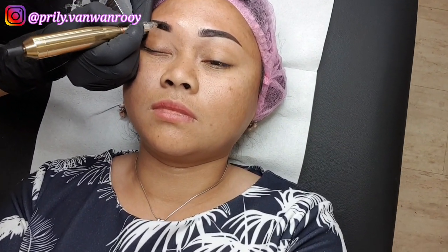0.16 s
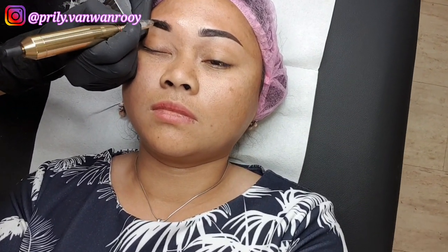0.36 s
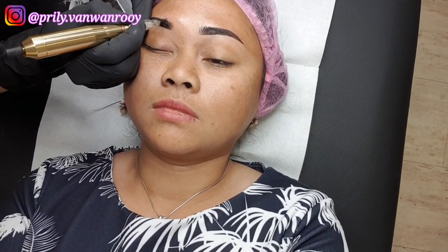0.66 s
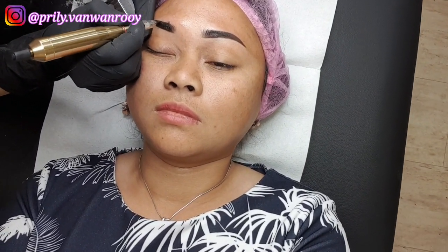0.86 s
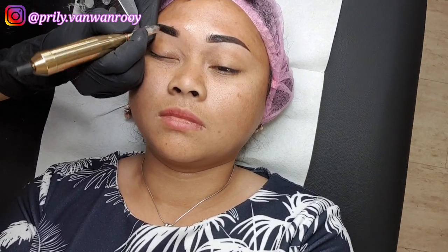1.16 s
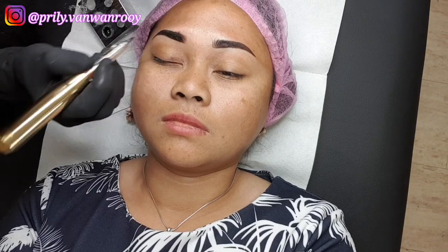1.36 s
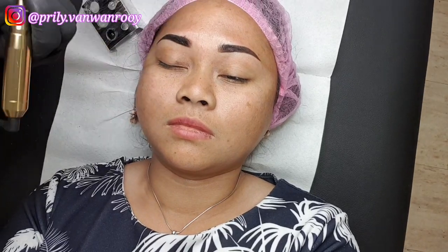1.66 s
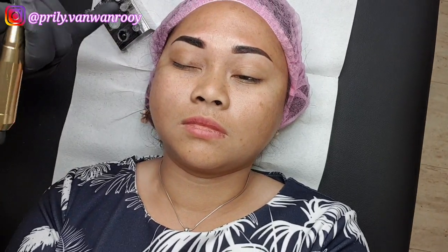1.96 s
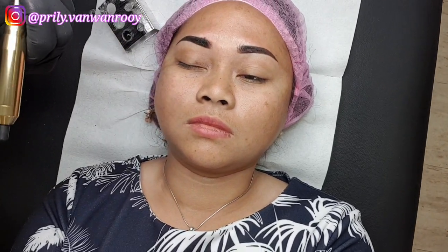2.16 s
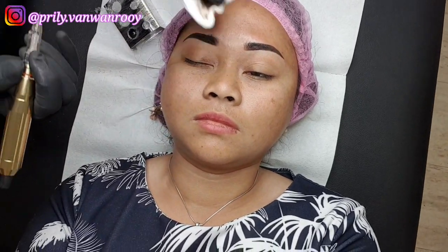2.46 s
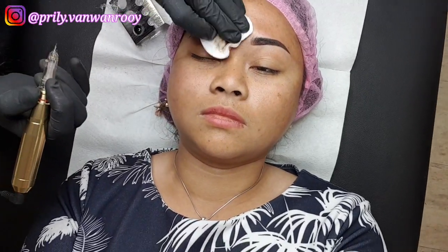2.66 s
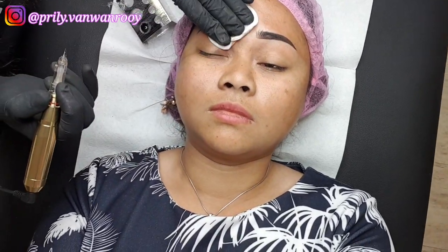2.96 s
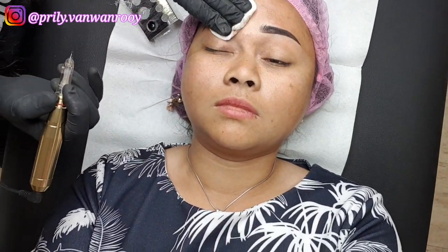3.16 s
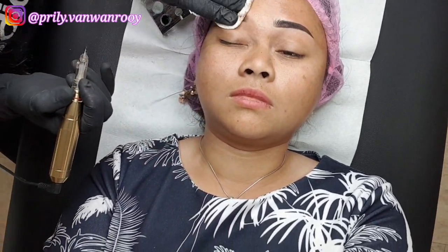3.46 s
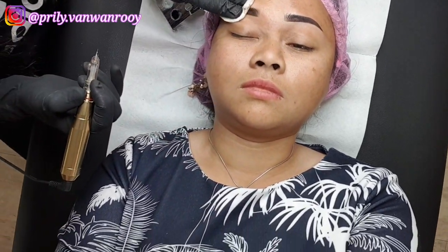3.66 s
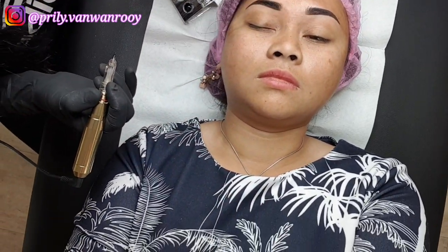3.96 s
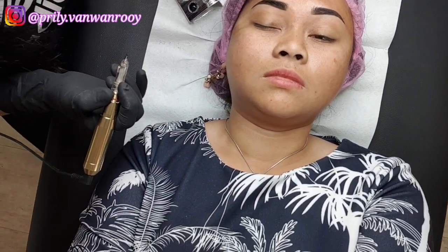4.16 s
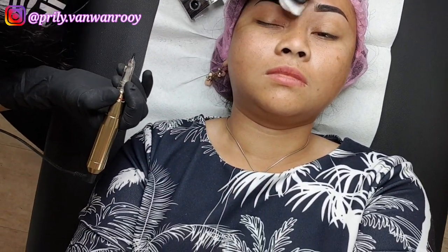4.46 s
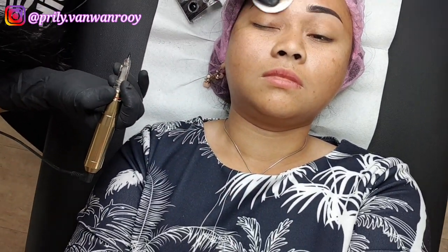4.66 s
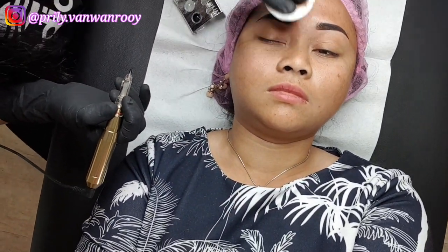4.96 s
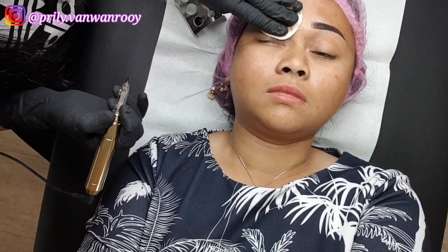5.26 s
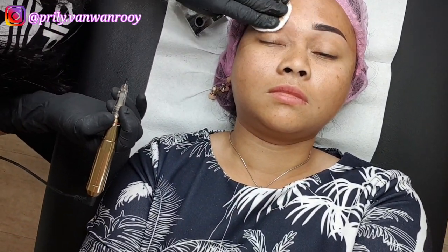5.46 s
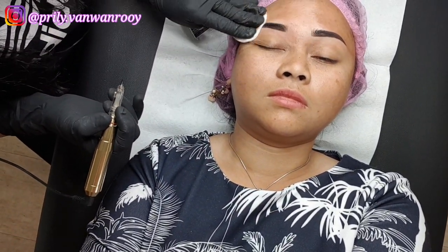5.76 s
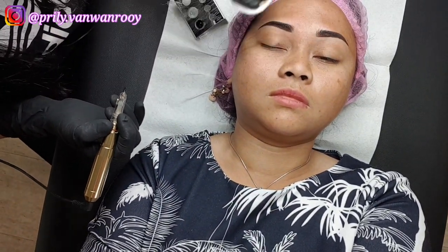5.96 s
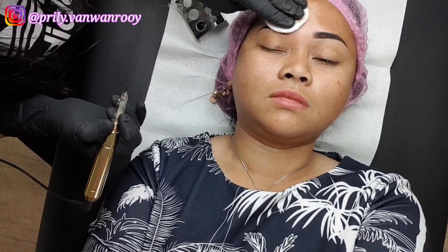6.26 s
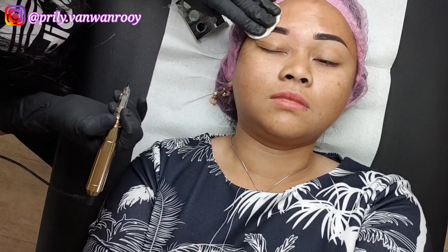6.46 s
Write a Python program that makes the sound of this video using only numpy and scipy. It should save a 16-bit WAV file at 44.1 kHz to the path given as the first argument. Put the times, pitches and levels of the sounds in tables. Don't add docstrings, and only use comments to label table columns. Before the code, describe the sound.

Close stereo phone pickup in a quiet indoor room. Throughout, a small rotary pen machine runs with a steady, fast, dry buzz of about ninety turns a second, bright and rattly, with a thin high electric whine. Beneath it are deep uneven traffic rumble through the walls, strongest in the first second, soft ventilation hiss and a hollow draught on the left. From 0 to 1.3 seconds seven short bursts of rapid crisp needle taps come about every fifth of a second, alternating bright and duller. Around 1.5 the pen moves aside; its buzz thins and shifts, the whine rising until about 2.5, with a brief brighter swell near 2.2. Two plastic clicks sound at 1.8, a soft one at 2.8, then a low one at 4.2 and a firm one at 4.3. A faint far engine drones around 2 to 4. From about 5.5 to 6 a car swishes faintly past outside as the pen buzzes on to 6.6.

```python
import sys
import numpy as np
from scipy import signal
from scipy.fft import rfft, irfft, next_fast_len
from scipy.io import wavfile
from scipy.ndimage import uniform_filter1d, map_coordinates

SR = 44100
rng = np.random.default_rng(int(sys.argv[2]) if len(sys.argv) > 2 else 0)


def makeup_ratio(level_db):
    decades = np.asarray(level_db, float) / 20
    return 10 ** decades


def store_wav(level_fs):
    pcm = np.round(np.clip(np.atleast_2d(level_fs), -1, 1) * 32767)
    wavfile.write(sys.argv[1], SR, pcm.T.astype(np.int16))


N = 291942
TIME = np.arange(N) / SR


def unit(x):
    return x / np.sqrt(np.mean(x ** 2) + 1e-20)


def curves(rows, at=TIME):
    s, *columns = np.transpose(rows)
    return [np.interp(at, s, column) for column in columns]


def wobble(rate, at=TIME):
    return map_coordinates(rng.standard_normal(200), [at * rate])


def coloured(gain, alike):
    size = next_fast_len(N)
    spectrum = rfft(rng.standard_normal((2, size))) * gain(np.fft.rfftfreq(size, 1 / SR))
    mid, side = irfft(spectrum, size)[:, :N]
    turn = np.arccos(np.clip(alike, 0, 1)) / 2
    mid, side = np.cos(turn) * mid, np.sin(turn) * side
    return unit(np.array([mid + side, mid - side]))


def modes(rows):
    return lambda f: np.sqrt(sum(makeup_ratio(2 * db) / (1 + ((f - hz) / width) ** 2) ** 2 for hz, width, db in rows))


def steady(x, share):
    envelope = uniform_filter1d(np.abs(signal.hilbert(x.mean(0), next_fast_len(N))[:N]), size=1500)
    return unit(x / (envelope + 0.46) ** share)


def room(x, t60, wet_db):
    t = np.arange(SR // 5) / SR
    tail = rng.standard_normal((2, len(t))) * makeup_ratio(-60 * t / t60) * (t > .0015)
    return x + makeup_ratio(wet_db) * signal.fftconvolve(x, tail / np.linalg.norm(tail[0]), axes=1)[:, :N]


def rings(start, hz, gain, t60, rise):
    first = np.ceil(start * SR).astype(int)
    index = first[:, None] + np.arange(400)
    t = index / SR - start[:, None]
    wave = np.sin(2 * np.pi * hz[:, None] * t) * makeup_ratio(-60 * t / t60) * (1 - np.exp(-t / rise)) ** 3
    return np.bincount(index.ravel(), (gain[:, None] * wave).ravel(), N + SR)[:N]


OUTSIDE = makeup_ratio([[.7], [-.7]])

# time in seconds, rumble in dB.
STREET = [(0, -41), (.8, -39.5), (1.3, -47.5), (1.85, -43), (2.45, -46), (2.8, -49.5), (3.8, -49),
          (4.5, -45), (5.2, -50.5), (5.5, -46), (6.62, -51)]
# peak time in seconds, peak in dB, half length in seconds.
LORRIES = [
    (0, -41, 0.097),
    (1.5, -47.5, 0.061),
    (1.886, -45.5, 0.18),
    (2.513, -56, 0.15),
    (4.378, -48.5, 0.17),
    (6.083, -44.5, .15),
]
# frequency in Hz, width in Hz, level in dB.
RUMBLE = [(33, 5, -21), (41, 3, -11), (46, 2.2, -3), (51, 2.2, 0), (66, 2.6, -5)]
BOOM = [(105, 0.79, 3), (98.3, 5.6, -5.5)]
DRONE = [(128, 5.3, -2), (158.5, 5.7, -5.5), (168.6, 1.4, -2), (147.5, 60, -17), (184.8, 12.4, -14)]
MURMUR = [(253.3, 3.7, -4.5), (286, 35, -4.5), (335, 4.7, 1.5), (218.4, 3.7, -1), (435, 56, -12.5)]


def traffic():
    rumble_db, = curves(STREET)
    boom = makeup_ratio(-52) + sum(makeup_ratio(db) * np.exp(-((TIME - s) / half) ** 2) for s, db, half in LORRIES)
    drone_db = -51.5 + 0.19 * (rumble_db + 49) + 2.04 * wobble(1.715)
    tyres_db = -62 + 1.8 * wobble(3.59)
    hum = makeup_ratio(rumble_db) * steady(coloured(modes(RUMBLE), alike=0.96), share=0.4)
    hum = hum + boom * steady(coloured(modes(BOOM), alike=0.99), share=0.47)
    hum = hum + makeup_ratio(drone_db) * steady(coloured(modes(DRONE), alike=1.0), share=0.51)
    hum = hum + makeup_ratio(tyres_db) * coloured(modes(MURMUR), alike=0.81)
    return hum * OUTSIDE


# frequency in Hz, density in dB per Hz.
AIR = [(88, -26), (150, 7.5), (244, -11), (374, -3), (510, -28), (798, -5), (1150, -21), (2880, -19),
       (3430, -25.5), (6260, -9.5), (10400, -10), (14700, -15), (15900, -41)]
# frequency in Hz, width in Hz, level in dB.
PORT = [(368, 31.6, 8), (768.7, 86.5, -1)]
# time in seconds, level in dB.
DRAUGHT = [(0, -63), (1.1, -65.5), (1.25, -68), (1.4, -65.5), (2.3, -65), (2.8, -61.5), (5.3, -62),
           (5.9, -59), (6.62, -62.5)]


def air():
    hz, db = np.transpose(AIR)
    hiss = coloured(lambda f: makeup_ratio(np.interp(np.log(f + 1), np.log(hz), db)), alike=0.04)
    cavity = coloured(modes(PORT), alike=0.16) * makeup_ratio([[6], [-12]])
    cavity_db = curves(DRAUGHT)[0] + 2 + 1.34 * wobble(8.7)
    return makeup_ratio(-55.0 + 0.4 * wobble(1.84)) * hiss + makeup_ratio(cavity_db) * cavity


# time in seconds, speed in turns per second.
SPEED = [(0, 88.9), (1.08, 88.9), (1.14, 90.6), (1.25, 90.6), (1.4, 92.2), (1.47, 90.1), (1.6, 91.4),
         (2.2, 90.6), (2.8, 91), (3.2, 91.4), (4, 90.9), (4.3, 90.4), (4.9, 90), (5.2, 90.5), (5.5, 89.7),
         (5.8, 91.35), (6.1, 92.4), (6.62, 92.5)]


def shaft():
    sag, hunt = 1.6, .25
    loaded = sum((TIME > start) & (TIME < start + length) for start, length, *_ in STROKES)
    speed = curves(SPEED)[0] - sag * uniform_filter1d(1. * loaded, size=900) + hunt * wobble(5)
    return np.cumsum(speed) / SR + .13


# time in seconds, extra delay to the left port in microseconds.
LAG = [(0, 15), (1.3, 10), (1.6, 100), (2, 120), (2.5, 125), (2.9, 92), (3.3, 88), (4.2, 40), (6.62, 42)]


def knocks(turns, contacts, drift_db, scatter_db, jitter_s, detune=lambda s: 1):
    out = np.zeros((2, N))
    for share, hz, db, t60 in contacts:
        s = np.interp(np.arange(1, int(turns[-1]) - 1) + share, turns, TIME)
        s = s + jitter_s * rng.standard_normal(len(s)) + 3e-5 * wobble(3, s)
        size_db = db + scatter_db * rng.standard_normal(len(s)) + drift_db * wobble(3.12, s)
        for ear, late in zip(out, (curves(LAG, s)[0] / 1e6, 0)):
            path_db = 1.2 * wobble(2.2, s)
            arrival = s + late + 6e-6 * wobble(1.5, s)
            ear += rings(arrival, hz * detune(s) + 0 * s, makeup_ratio(size_db + path_db), t60, rise=.0004)
    return out


# time in seconds, shell level in dB, shell ring in Hz.
PEN = [(0, -47.5, 10500), (.62, -47, 10100), (1.33, -45.5, 10200), (1.41, -45.5, 9800), (1.49, -50, 10130),
       (1.56, -58, 10100), (1.95, -55, 10280), (2.23, -45.5, 9910), (2.45, -56, 10100), (2.62, -52, 10470),
       (2.9, -59.5, 10350), (3.13, -57.5, 10200), (4.04, -57.5, 9670), (4.2, -54, 10230),
       (4.94, -52, 10160), (5.6, -58, 10390), (6.1, -57, 9850), (6.62, -55.5, 10170)]
# share of the turn, ring in Hz, level in dB, t60 in seconds.
SHELL = [(0.005, 10370, 13.5, 0.002), (0.032, 11370, 3, 0.0022), (.11, 10300, -20, 0.00047),
         (.55, 10040, 9, 0.00086), (.58, 9300, -4, 0.0023), (.66, 8560, -22, 0.0017),
         (.3, 10350, -15.5, 0.012), (.08, 8800, -6, 0.0019)]
BARREL = [(.17, 8200, -5.5, 0.00075), (0.259, 7620, -2.5, 0.0022), (0.499, 8430, -1.5, 0.003),
          (.6, 9100, -6, 0.0016)]
TIP = [(.2, 13600, -9, 0.004), (.5, 12800, -11, 0.004), (.78, 14500, -8, 0.004), (.36, 15150, -12, 0.003)]


def bright_parts(turns):
    shell_db, _ = curves(PEN)
    barrel_db = -60.5 + 0.0309 * curves(LAG)[0]
    pitch = np.gradient(turns) * SR / 90
    shell = knocks(turns, SHELL, 0.62, 0.5, 6e-6,
                   lambda s: curves(PEN, s)[1] / 10300 * np.interp(s, TIME, pitch))
    parts = [(shell, shell_db + 1.5),
             (knocks(turns, BARREL, 0.4, 0.95, 6e-6), barrel_db + 3.0),
             (knocks(turns, TIP, 1.0, 1.7, 2.5e-5), 0.42 * shell_db - 39)]
    return sum(makeup_ratio(db) * unit(room(part, t60=.1, wet_db=-5)) for part, db in parts)


# time in seconds, spring level in dB.
FACING = [(0, -68.5), (1.4, -67.5), (1.75, -60.5), (2.42, -60.5), (2.58, -67.5), (3.2, -65.5), (3.8, -65),
          (6.62, -65.5)]
# share of the turn, ring in Hz, level in dB, t60 in seconds.
GRIP = [(0.222, 4930, 8.5, 0.0033), (0.422, 5450, 2, 0.0039), (.46, 6700, -10, 0.0073),
        (0.698, 4573, -6, 0.0037)]
SPRING = [(0.1475, 3626, 14, 0.0042), (.93, 3500, 8.5, 0.0063), (0.412, 1018, -24.5, 0.052)]
COLLAR = [(0.202, 4330, 6, 0.0028), (0.722, 3820, 5, 0.002)]
HAND = [(0.2896, 1360, -2.5, 0.0027), (.8, 1870, -9, 0.0051), (0.7, 2570, 4.5, 0.002)]


def dull_parts(turns):
    (shell_db, _), (spring_db,) = curves(PEN), curves(FACING)
    grip_db = -56.5 + 0.48 * (shell_db + 52)
    collar_db = spring_db + 7.5 - 2.27 * TIME
    play_s = 2.6e-5
    parts = [(knocks(turns, GRIP, 2.8, 0.83, play_s), grip_db - 4.5),
             (knocks(turns, SPRING, 0.93, 2.2, play_s), spring_db),
             (knocks(turns, COLLAR, 0.72, 2.4, play_s), collar_db),
             (knocks(turns, HAND, 0.92, 2.1, 6e-5), 0.56 * shell_db - 42.5)]
    return sum(makeup_ratio(db) * unit(room(part, t60=.06, wet_db=-1.5)) for part, db in parts)


# time in seconds, whine in dB, left port's lead in radians.
AIM = [(0, -71, -2.9), (1.25, -69, -3.0), (1.6, -62, 0), (2.2, -59, -.2), (2.55, -61, -.8),
       (2.85, -65, 1.2), (3.5, -67, 1.3), (3.76, -68, 3), (4.3, -68, 4.3), (4.9, -69, 4), (5.2, -70, 2.8),
       (5.75, -68, 1.1), (6.62, -68, 1.8)]


def whine(turns):
    chop = 1 + 0.077 * np.sin(2 * np.pi * turns)
    whine_db, lead = curves(AIM)
    phase = 2 * np.pi * 8783.5 * TIME + np.array([lead, -lead]) / 2
    phase = phase + 0.61 * wobble(13.0)
    level_db = whine_db + 9.0 + 1.6 * wobble(5.98) + [[-1.2], [1.2]]
    return makeup_ratio(level_db) * chop * np.sin(phase)


def pen():
    turns = shaft()
    aside = np.clip((curves(LAG)[0] - 15) / 25, 0, 1)
    pan_db = 0.32 - 3 * aside + 0.69 * wobble(4.2)
    return (bright_parts(turns) + dull_parts(turns) + whine(turns)) * makeup_ratio([pan_db / 2, -pan_db / 2])


# first tap in seconds, length in seconds, peak in dB, dull part in dB.
STROKES = [
    (0.05, 0.1, -26, -32),
    (0.2083, .082, -23, -18),
    (0.4013, .113, -24.5, -30),
    (0.594, 0.09, -22.5, -16),
    (0.788, .09, -24, -33),
    (1.002, .078, -22, -16.5),
    (1.172, 0.1, -25.5, -35),
]
# frequency in Hz, level in dB, t60 in seconds.
NEEDLE = [(13300, 0.5, 0.0021), (14700, 0.5, 0.0014), (12060, 3, 0.0013), (6860, -7, 0.0039),
          (5320, -7, 0.0023), (9260, -2.5, 0.0021)]
SKIN = [(3040, -2.5, 0.013), (1530, -12, 0.02), (2230, -12, 0.013)]


def needle():
    out = np.zeros((2, N))
    tap_gap_s, rebound_s, rebound_db = .0116, .0024, -11
    for start, length, db, dull_db in STROKES:
        rebound = np.arange(22) % 2
        s = start + tap_gap_s * (np.arange(22) // 2) + rebound_s * rebound
        progress = np.clip((s - start + 0.0062) / length, 0, 1)
        luck = rng.standard_normal((len(s), 3))
        size_db = db + 8 * np.log10(np.sin(np.pi * progress) + 0.053) - 60 * (progress >= 1)
        size_db = size_db + rebound_db * rebound + 3 * luck[:, 0]
        dull = [(hz, level + dull_db - 3.5, t60) for hz, level, t60 in SKIN]
        for ear, side in zip(out, (1, -1)):
            for hz, level, t60 in NEEDLE + dull:
                spread = rng.standard_normal((len(s), 2))
                gain = makeup_ratio(size_db + level + side * luck[:, 1] + 1.4 * spread[:, 0])
                ear += rings(s + side * 8e-6, hz * (1 + 0.035 * spread[:, 1]), gain, t60, rise=0.00007)
    return room(out, t60=.06, wet_db=-8)


# time in seconds, peak in dB, ring in Hz.
CLICKS = [
    (1.7925, -27.5, 2720),
    (1.8126, -26.5, 3800),
    (2.7756, -34, 5230),
    (2.8654, -58, 5300),
    (4.179, -34, 2030),
    (4.3345, -30, 5000),
]


def clicks():
    s, db, hz = np.transpose(CLICKS)
    partials = [(1.104, 8.5), (1.296, -7.5), (5.5, -2), (0.6, -3)]  # (ratio, dB)
    tick = sum(rings(s, hz * ratio, makeup_ratio(db + level), 0.0022, 0.00018) for ratio, level in partials)
    return room(np.array([np.roll(tick, 4), tick]), t60=.08, wet_db=-5)


# time in seconds, pitch in Hz, level in dB.
ENGINE = [(0, 313.6, -84), (2.3, 313.3, -62.5), (2.6, 292.5, -57.5), (3.6, 287, -61), (4.4, 296, -73.5),
          (6.62, 269, -99)]


def engine():
    hz, db = curves(ENGINE)
    level = makeup_ratio(db + 1.7 * wobble(3.21))
    return level * np.sin(2 * np.pi * np.cumsum(hz) / SR + 2.2 * wobble(6)) * OUTSIDE


# time in seconds, swish in dB.
PASSING = [(0, -82), (5.2, -114), (5.6, -67), (5.9, -66.5), (6.2, -76), (6.62, -72)]
# frequency in Hz, width in Hz, level in dB.
SWISH = [(520, 13, 10), (620, 100, 7), (800, 31, -6)]


def passing_car():
    return makeup_ratio(curves(PASSING)[0]) * coloured(modes(SWISH), alike=0.26)


def scene():
    return traffic() + air() + pen() + needle() + clicks() + engine() + passing_car()


def low_pass(x):
    return signal.sosfilt(signal.butter(12, 15770, fs=SR, output="sos"), x)


def record(dry):
    size = next_fast_len(N)
    hz = np.fft.rfftfreq(size, 1 / SR)
    bass_cut = hz ** 4 / (hz ** 4 + 26 ** 4)
    roll_off = makeup_ratio(-12 * np.clip((hz - 15550) / 60, 0, 1)) * (hz < 15750)
    mix = irfft(rfft(dry, size) * roll_off * bass_cut, size)[:, :N]
    return low_pass(mix)


dry = scene()
out = record(dry)
store_wav(out)
```